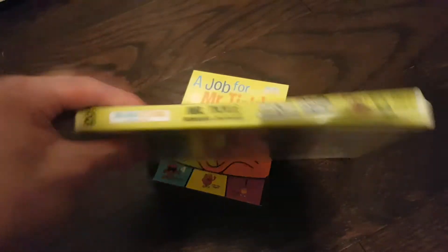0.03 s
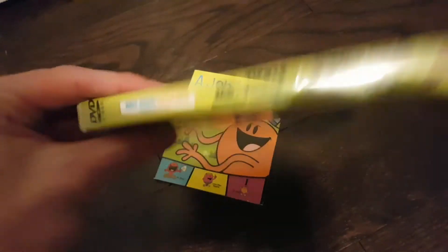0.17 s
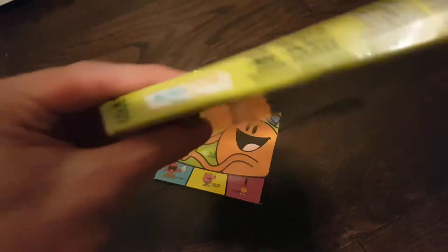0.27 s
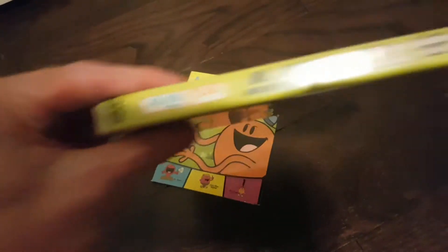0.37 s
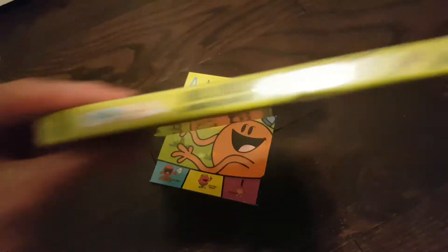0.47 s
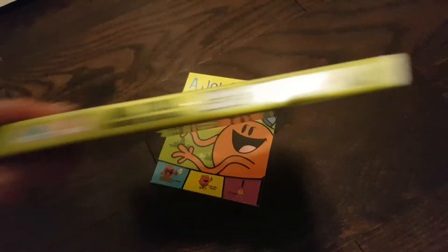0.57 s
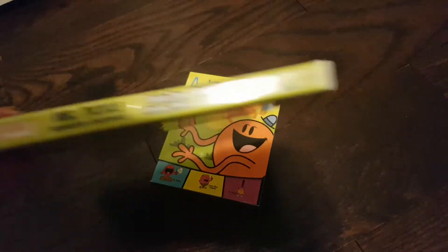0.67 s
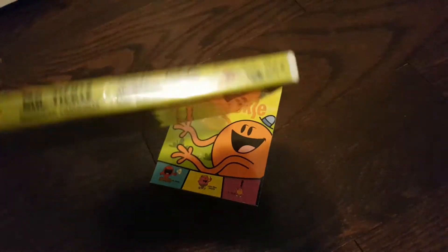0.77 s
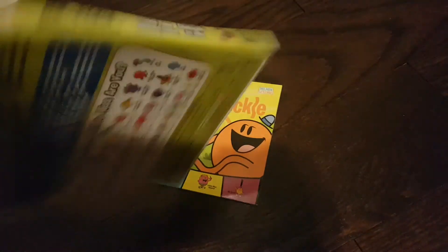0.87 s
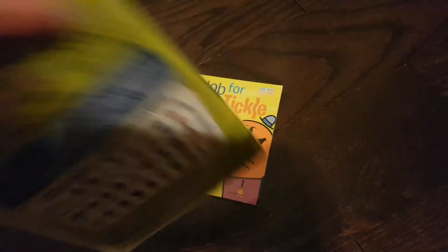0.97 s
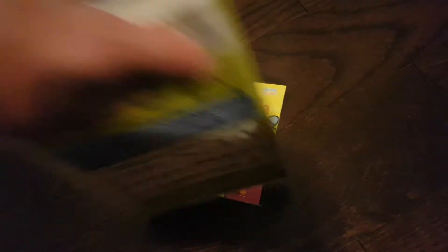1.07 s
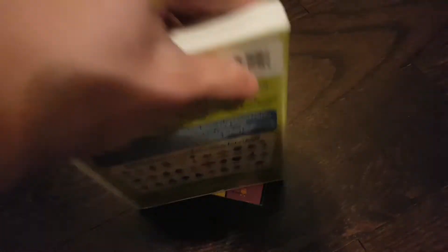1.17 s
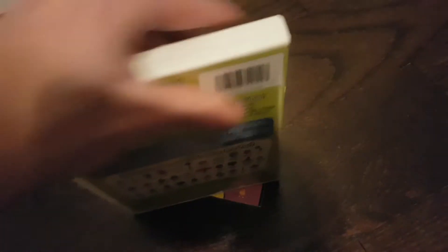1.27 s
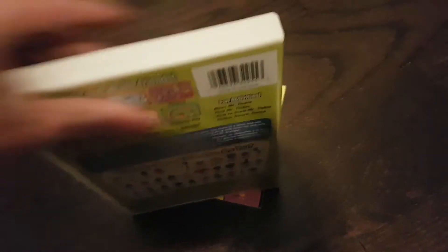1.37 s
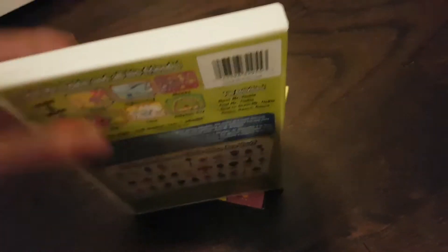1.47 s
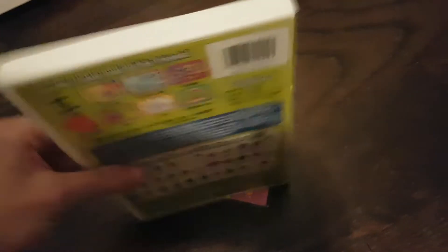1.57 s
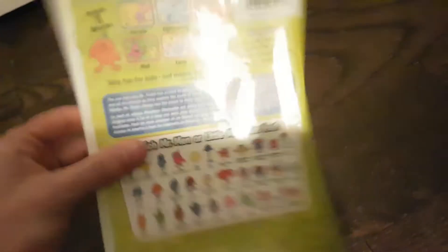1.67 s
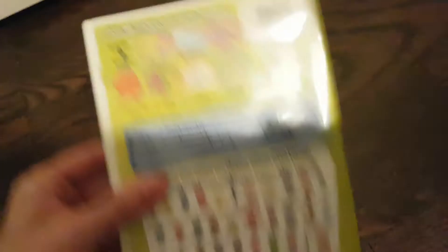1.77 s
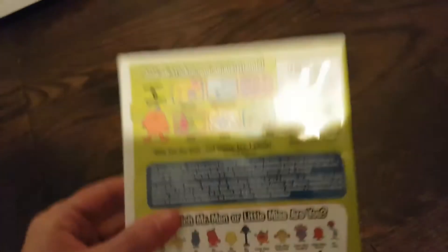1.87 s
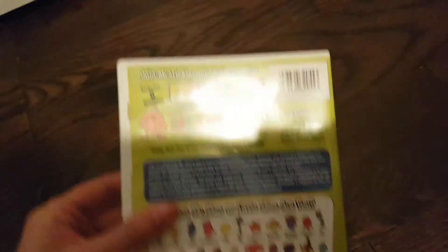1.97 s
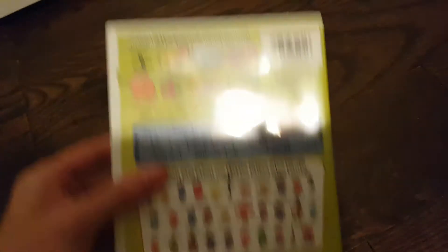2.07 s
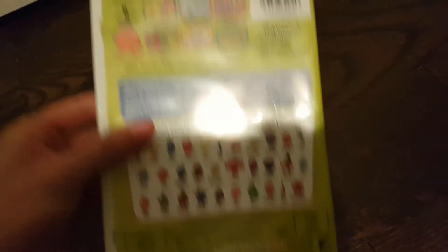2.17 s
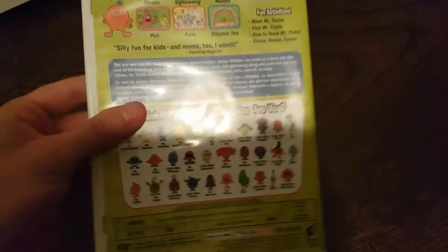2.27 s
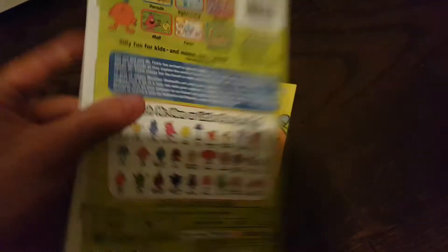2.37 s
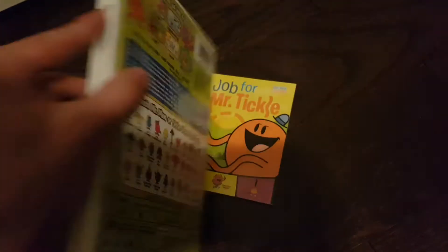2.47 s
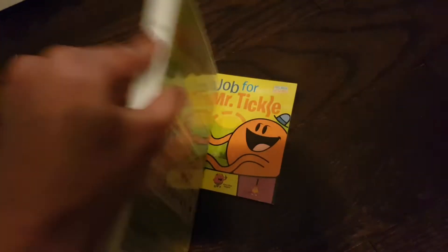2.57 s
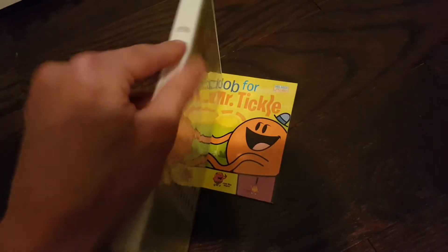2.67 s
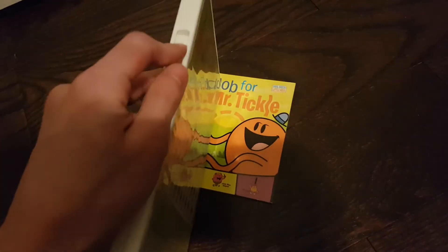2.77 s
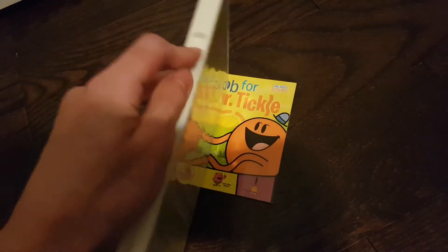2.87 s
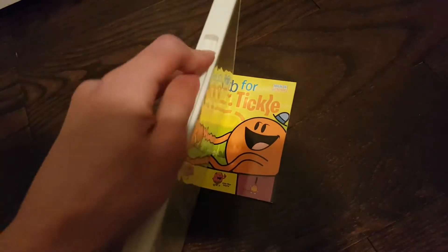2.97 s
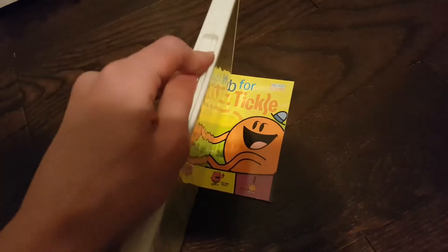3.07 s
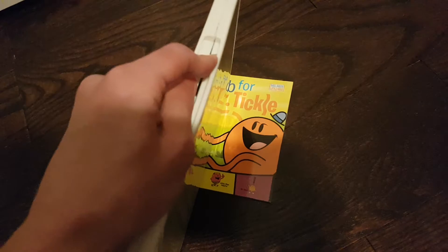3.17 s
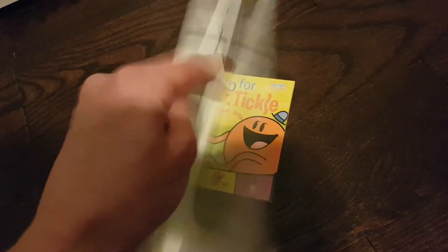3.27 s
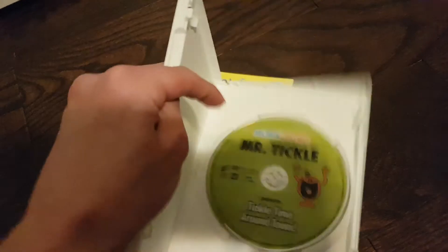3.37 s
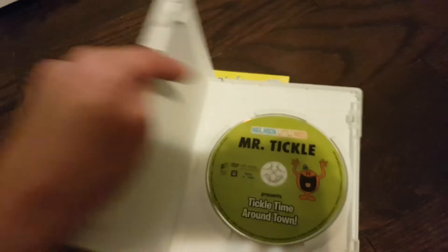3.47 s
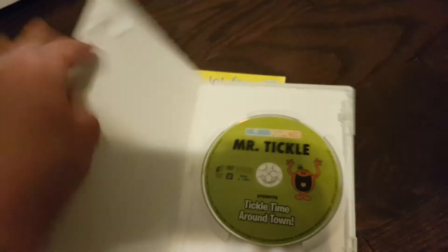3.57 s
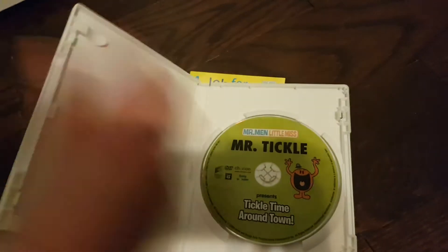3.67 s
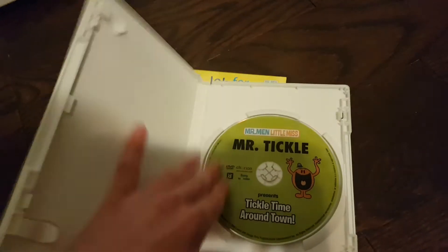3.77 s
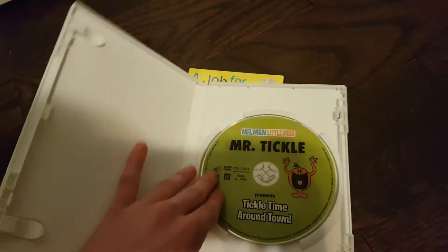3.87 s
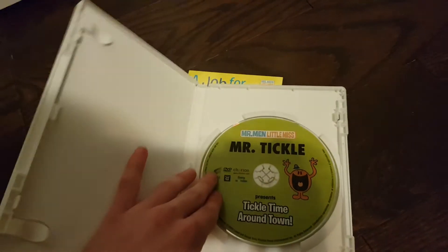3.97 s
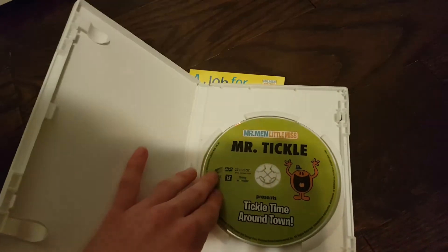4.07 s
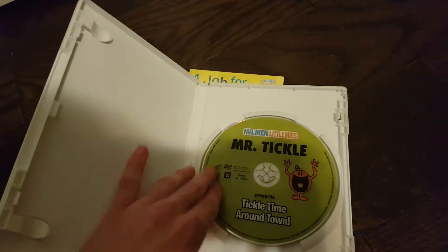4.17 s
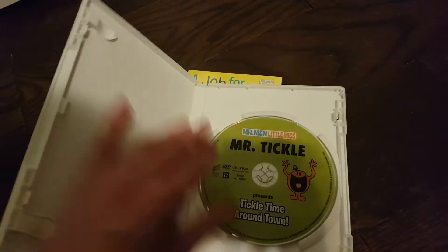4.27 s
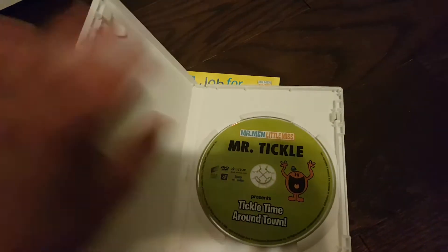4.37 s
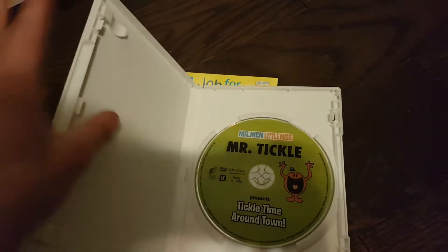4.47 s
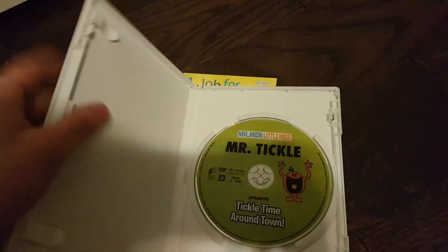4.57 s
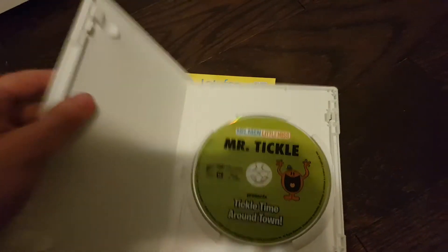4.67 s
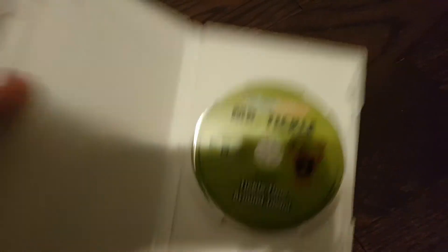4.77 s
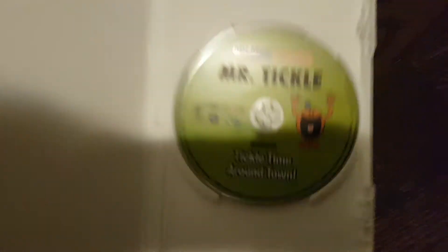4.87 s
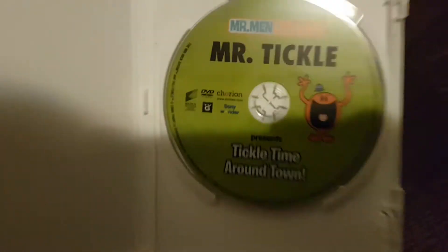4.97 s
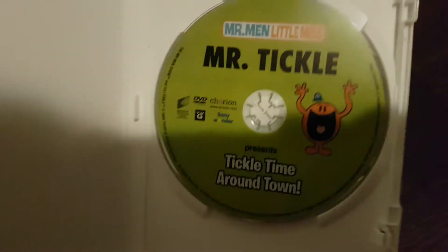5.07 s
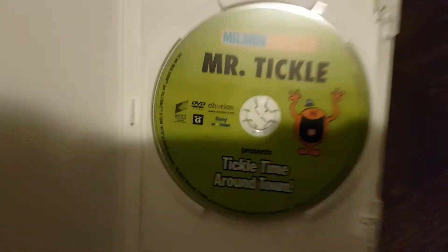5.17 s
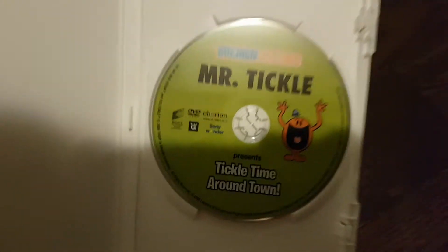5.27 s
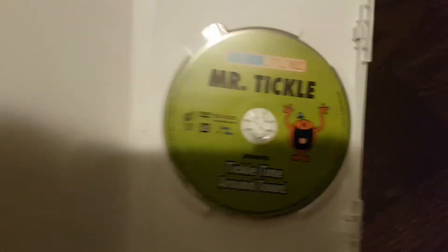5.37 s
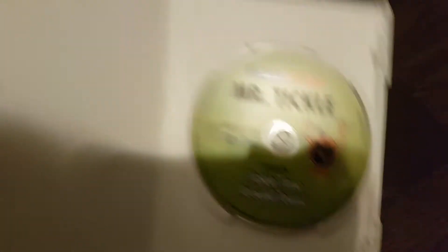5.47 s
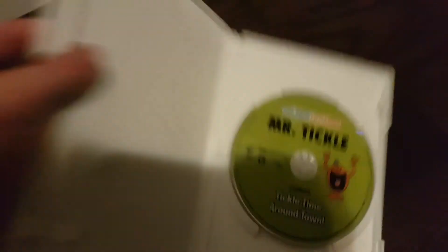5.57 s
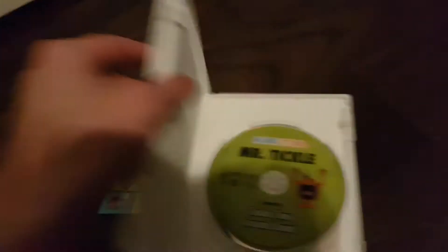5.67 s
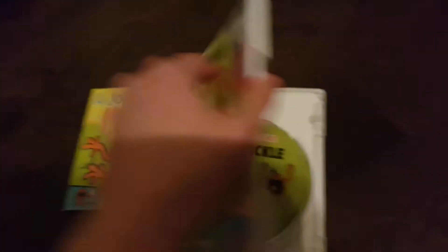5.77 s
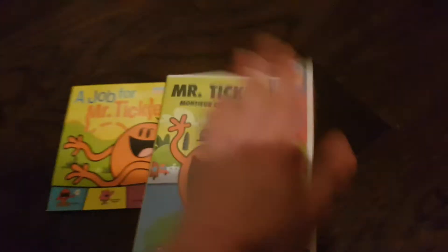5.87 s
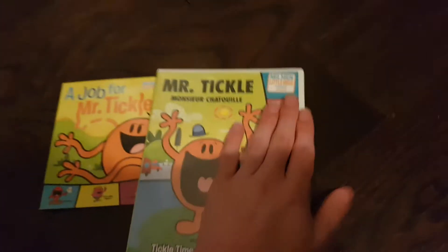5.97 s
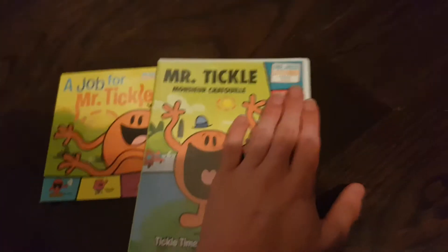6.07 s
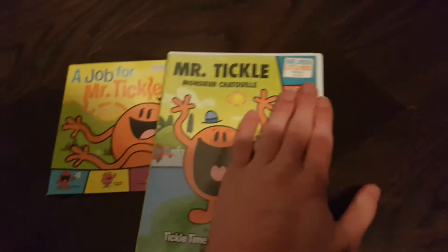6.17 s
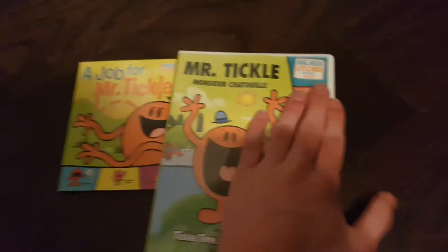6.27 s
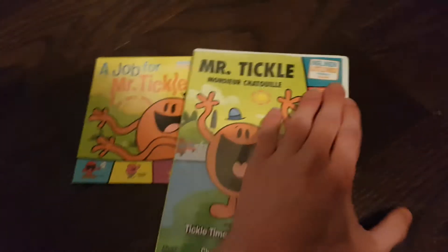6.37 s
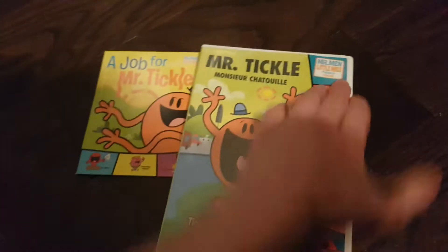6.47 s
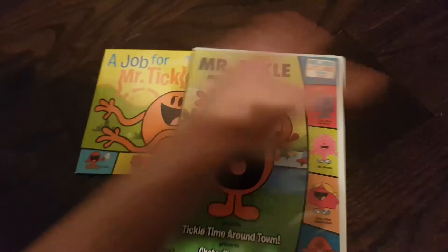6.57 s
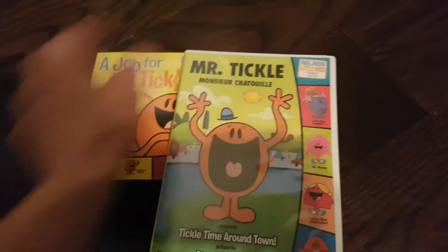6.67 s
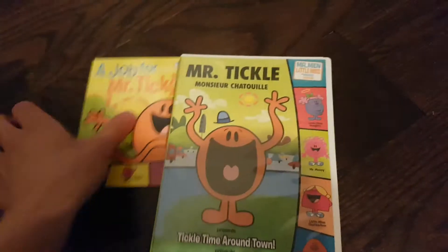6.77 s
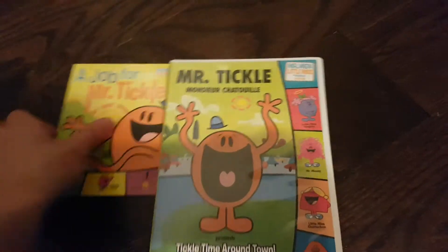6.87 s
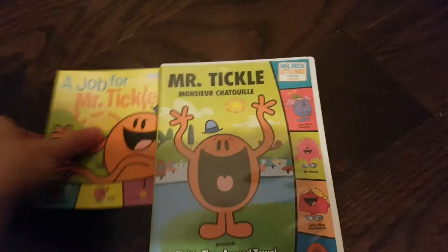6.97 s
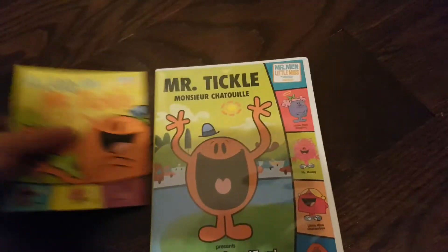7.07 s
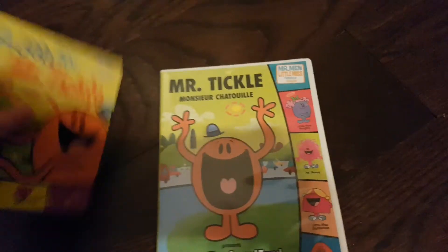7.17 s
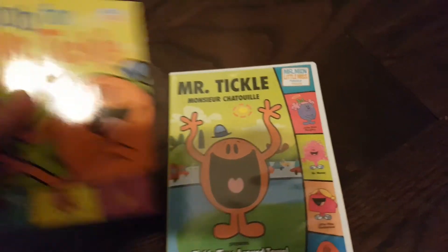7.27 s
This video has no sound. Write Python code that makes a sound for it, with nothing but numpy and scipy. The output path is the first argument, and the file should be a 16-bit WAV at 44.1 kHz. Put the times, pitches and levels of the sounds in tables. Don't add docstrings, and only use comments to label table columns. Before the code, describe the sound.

A quiet furnished room, heard closely in stereo, with low house rumble, thin steady hiss and a short soft reverberation. At 0.05 s a hollow plastic case makes a light cluster of taps; near 0.8 s there is a tiny tick, and at 1.1 s a firm, boxy knock. Faint fingertip rubs and ticks follow at 1.25-1.6 s, then a soft flurry around 2.55 s. At 3.28 s the case snaps open, a loud bright double crack with smaller rattles to 3.6 s. From 3.8 to 4.8 s only very faint brushes and ticks remain, followed by a barely audible airy drone around 5 s. Crisp closing clicks come at 5.6-5.75 s, more clacks at 5.9-5.97 s, then the loudest hollow knocks at 6.2 and 6.3 s. A soft airy swell passes at 6.4 s. Gentle taps, sliding and skin-like hiss fade out by 7.3 s.

```python
import sys
import numpy as np
from scipy import signal
from scipy.fft import rfft, irfft, next_fast_len
from scipy.io import wavfile

SR = 44100
rng = np.random.default_rng(int(sys.argv[2]) if len(sys.argv) > 2 else 0)


def output_pcm(signal):
    pcm = np.clip(np.atleast_2d(signal).T, -1, 1) * 32767
    wavfile.write(sys.argv[1], SR, np.round(pcm).astype(np.int16))


def volts_from_decibels(level):
    exponent = np.asarray(level, float) / 20
    return 10 ** exponent


N = 322795

# t/s, panel peak level/dB, loudest panel f/Hz, cavity level/dB, rim level/dB, crack level/dB
CASE_CONTACTS = [(0.051, -25.5, 700, -47, -43, -66), (0.058, -38.5, 1090, -61.5, -44, -64),
                 (0.065, -30, 1010, -41, -47.5, -65), (0.071, -31.5, 690, -35.5, -58, -65),
                 (0.781, -43, 791, -71, -68, -57.5), (0.928, -55, 705, -73, -76, -76.5),
                 (1.107, -11, 696, -16.5, -29.5, -42), (1.112, -23, 735, -17, -36, -51),
                 (1.233, -44, 743, -54, -58, -62.5), (1.251, -58.5, 600, -53, -66, -67),
                 (1.291, -39, 732, -42.5, -56, -74), (1.569, -33, 1320, -39, -48.5, -68),
                 (1.577, -40.5, 1190, -47, -53, -60), (1.597, -58, 1370, -52, -64, -72),
                 (2.447, -59, 603, -75, -62, -70), (2.535, -58, 791, -67, -80, -66.5),
                 (2.557, -33, 1190, -47, -41, -51.5), (2.569, -32, 646, -30.5, -58, -66.5),
                 (2.584, -30.5, 624, -29, -62, -68), (2.596, -28.5, 764, -30, -45, -64),
                 (2.741, -43.5, 649, -40.5, -62, -75.5), (2.892, -63, 834, -62, -58, -75.5),
                 (3.279, -10.5, 722, -21, -26.5, -33.5), (3.288, -11.5, 737, -44, -20.5, -38),
                 (3.293, -5.5, 1220, -44, -26, -38.5), (3.338, -35, 1020, -41, -35.5, -42.5),
                 (3.355, -31, 1800, -43, -34, -57), (3.377, -40, 778, -41, -39, -52.5),
                 (3.409, -23, 1430, -37.5, -35.5, -51.5), (3.42, -49, 716, -53, -37.5, -58),
                 (3.474, -58, 643, -63, -48, -55.5), (3.517, -60, 730, -56, -62, -52.5),
                 (3.573, -35, 1340, -51, -48.5, -52), (3.585, -46, 1010, -63, -67, -62.5),
                 (3.785, -51, 1026, -60, -39.5, -78.5), (3.806, -54, 1560, -71.5, -59.5, -75),
                 (3.823, -49, 794, -52.5, -50, -72), (3.858, -47.5, 1060, -67.5, -55.5, -69),
                 (4.179, -55, 611, -64, -60.5, -80), (4.206, -52, 1560, -64, -56, -83),
                 (4.363, -72, 657, -63.5, -60.5, -62.5), (4.567, -54, 1940, -72, -64, -81.5),
                 (4.614, -56, 727, -55, -63, -69.5), (4.769, -45, 1080, -63, -62, -75.5),
                 (4.785, -43.5, 1130, -69, -53, -74), (4.792, -35, 1070, -76.5, -49.5, -75),
                 (5.607, -15, 1154, -42, -25.5, -38), (5.649, -16, 780, -55, -26, -34),
                 (5.698, -34, 891, -35, -37, -50.5), (5.703, -32, 1840, -35.5, -31.5, -46),
                 (5.71, -27, 1510, -45, -35, -56.5), (5.737, -32, 1530, -49, -63, -68.5),
                 (5.77, -51, 1990, -57, -49, -58.5), (5.789, -52, 646, -58, -65, -63.5),
                 (5.901, -18.5, 940, -31, -32.5, -42.5), (5.905, -17.5, 649, -35, -35, -48.5),
                 (5.971, -18.5, 906, -34.5, -37, -48.5), (6.082, -45, 780, -64, -65, -78.5),
                 (6.198, 0.5, 732, -20.5, -19.5, -34.5), (6.301, -4, 700, -34, -15.5, -29),
                 (6.304, -10.5, 810, -15, -21.5, -30), (6.528, -45, 742, -62, -69, -61.5),
                 (6.551, -31, 692, -55.5, -56.5, -53), (6.744, -34.5, 767, -50, -62.5, -70),
                 (6.758, -39, 785, -37, -52, -70), (6.771, -28.5, 675, -41.5, -48.5, -64),
                 (6.844, -45.5, 670, -51, -61, -65), (6.882, -38, 738, -56, -54, -67),
                 (6.926, -49, 802, -65, -74, -81), (7.094, -36.5, 785, -58, -48, -61),
                 (7.135, -42, 1380, -57, -48, -62.5)]
# f/Hz, level/dB, t60/s
CAVITY_MODES = [(148, -10.5, 0.018), (205, -10, .05), (304.3, -1.5, 0.029), (391.7, 9.5, 0.037),
                (494, 6, 0.047), (566, -4.5, 0.021)]
# f/Hz, level/dB, t60/s
PANEL_MODES = [(683, 2, .018), (738, 0.5, 0.032), (794, -1.5, 0.04), (930, -8, 0.018), (1024, 1.5, 0.017),
               (1220, 7, .012), (1380, 8, .012), (1492, 4.5, 0.014), (1673.5, 6, 0.018), (1800, 5, .01),
               (1870, 0.5, 0.018)]
# f/Hz, level/dB, t60/s
RIM_MODES = [(2160, -3, .007), (2480, 0, .007), (2930, 1, .006), (3130, 1, 0.0052), (3735, -1.5, 0.0035),
             (4296, 1, 0.0078), (4840, -3.5, 0.0036), (5390, -1, 0.0031), (6124, -4.5, .004)]


def contacts():
    ring_len = SR // 12
    out = np.zeros(N + SR)
    t_s = np.arange(ring_len) / SR
    mode_hz = np.array(PANEL_MODES)[:, :1]
    for start_s, panel_db, pitch_hz, cavity_db, rim_db, crack_db in CASE_CONTACTS:
        chance, force = rng.random((2, 300))
        chatter = (chance < 0.03) * (force - 0.3) * volts_from_decibels(-60 * t_s[:300] / 0.013)
        chatter[0] = 1
        octaves_off = np.abs(np.log2(mode_hz / pitch_hz))
        favour_db = -9.0 * np.minimum(octaves_off, 1.2)
        slow_push = np.convolve(chatter, np.hanning(60))
        panels = volts_from_decibels(panel_db) * struck(PANEL_MODES, chatter, 4.4, favour_db)
        cavity = volts_from_decibels(cavity_db) * struck(CAVITY_MODES, slow_push, 6.5)
        rim = volts_from_decibels(rim_db + 14.5) * struck(RIM_MODES, chatter, 2.5)
        crack = band(rng.standard_normal(ring_len), 4300, 16500) * volts_from_decibels(-60 * t_s / 0.015)
        at = round(start_s * SR)
        out[at:at + ring_len] += panels + cavity + rim + volts_from_decibels(crack_db + 11.5) * crack
    return out[:N]


def struck(modes, contact, spread_db, favour_db=0):
    hz, level_db, t60_s = np.transpose(modes)[:, :, None]
    t_s = np.arange(SR // 12) / SR
    strength, sign = rng.standard_normal((2, len(modes), 1))
    gains = volts_from_decibels(level_db + favour_db + spread_db * strength) * np.sign(sign)
    decaying = gains * volts_from_decibels(-60 * t_s / t60_s) * np.sin(2 * np.pi * hz * t_s)
    ringing = signal.fftconvolve(np.sum(decaying, axis=0), contact)[:len(t_s)]
    return ringing / np.abs(ringing).max()


# t/s, panel level/dB, rim level/dB, hiss level/dB
RUB_CURVES = [
    [(0.05, -42, -58, -71), (0.054, -35, -41, -64), (0.074, -55, -48, -63), (0.082, -53, -73, -87),
     (0.14, -82, -82, -89)],
    [(1.29, -54, -57, -75), (1.314, -67, -55, -60), (1.378, -80, -86, -73), (1.432, -83, -88, -71),
     (1.45, -89, -94, -95)],
    [(1.56, -67, -74, -80), (1.568, -47.5, -53, -62), (1.596, -54, -67, -75), (1.64, -80, -79, -87)],
    [(2.38, -90, -81, -90), (2.394, -70, -80, -76), (2.402, -79, -85, -64), (2.454, -85, -72, -78),
     (2.49, -77, -76, -88)],
    [(2.8, -73, -91, -89), (2.814, -67, -68, -93), (2.896, -59, -63, -71), (2.914, -65, -80, -81),
     (2.93, -72, -78, -94)],
    [(3.5, -48, -60, -80), (3.518, -62, -51, -54), (3.558, -59, -82, -82), (3.576, -44, -48, -47.5),
     (3.62, -86, -85, -90)],
    [(3.77, -85, -67, -86), (3.786, -59, -55, -72), (3.794, -63, -69, -77), (3.858, -62, -66, -74),
     (3.89, -76, -84, -89)],
    [(4.35, -83.5, -88, -97), (4.368, -60, -56, -55.5), (4.412, -77, -82, -84), (4.42, -68, -75, -87)],
    [(4.75, -76, -78, -88), (4.784, -55, -67, -74.5), (4.794, -39.5, -66, -81), (4.812, -77, -79, -84),
     (4.84, -68, -82, -93)],
    [(6.74, -55, -76, -84), (6.742, -50, -66, -81), (6.768, -47, -67, -76), (6.816, -52, -64, -83),
     (6.866, -47.5, -58, -63), (6.96, -77, -98, -88)],
    [(6.98, -64, -63, -83), (7.07, -50, -53, -68), (7.098, -51.5, -40, -50), (7.12, -76, -54, -63),
     (7.146, -54, -45.5, -45.5), (7.21, -77, -85, -87), (7.27, -85.5, -89, -90)],
]


def rubbing():
    slips_per_s = np.array([[900.], [2500.], [9000.]])
    bands_hz = [(300, 2200), (2000, 5700), (6500, 13000)]
    sizes = volts_from_decibels(2.7 * rng.exponential(1, (3, N))) * rng.choice([-1, 1], (3, N))
    slips = sizes * (rng.random((3, N)) < slips_per_s / SR)
    parts = [rms_one(band(x, low_hz, high_hz)) for x, (low_hz, high_hz) in zip(slips, bands_hz)]
    levels = sum(volts_from_decibels(in_time(rows, N)) for rows in RUB_CURVES)
    return volts_from_decibels(-7.5) * np.sum(levels * parts, axis=0)


# f/Hz, width/Hz, level/dB
PORT_PEAKS = [(4274, 2500, -5), (11000, 7500, 10.5)]
# t/s, left level/dB, right level/dB
WALL_ECHOES = [(.0065, -13.5, -15.5), (0.0142, -12, -14), (.0165, -16, -12), (0.022, -17.5, -14.5)]
# f/Hz, width/Hz, level/dB
CAPSULE_PEAKS = [(8150, 4900, -5.5), (13400, 5000, -1)]


def heard(x):
    right_lag_s, low_hz, top_hz = 0.00011, 111.1, 15900
    size = next_fast_len(N + SR // 4)
    hz = np.fft.rfftfreq(size, 1 / SR)
    left = peaks(PORT_PEAKS, hz, 0.61)
    right = peaks(PORT_PEAKS, hz, -0.92) * np.exp(-2j * np.pi * hz * right_lag_s)
    path = np.array([left, right])
    for delay_s, left_db, right_db in WALL_ECHOES:
        delayed = np.exp(-2j * np.pi * hz * delay_s) / (1 + 1j * hz / 2500)
        path = path + volts_from_decibels(np.array([[left_db], [right_db]])) * delayed
    spectrum = rfft(x, size) * path + rfft(room_tail(x), size)
    near = irfft(spectrum * peaks(CAPSULE_PEAKS, hz, 0.88), size)[:, :N]
    near = signal.sosfilt(signal.butter(3, low_hz, "high", fs=SR, output="sos"), near)
    return signal.sosfilt(signal.butter(8, top_hz, fs=SR, output="sos"), near)


def peaks(table, hz, share):
    out = 1
    for centre_hz, width_hz, level_db in table:
        root = volts_from_decibels(share * level_db / 2)
        off = centre_hz ** 2 - hz ** 2
        out = out * (off + 1j * hz * width_hz * root) / (off + 1j * hz * width_hz / root + 1e-9)
    return out


# f/Hz, t60/s
TAIL_T60 = [(100, .26), (300, 0.19), (750, 0.22), (2000, .24), (5000, 0.23), (13000, .22)]
# f/Hz, level/dB
TAIL_COLOUR = [(100, -5.5), (300, -5.5), (550, -6), (750, -2.5), (1100, -4.5), (1600, -4.5), (3000, -3),
               (6000, -3), (9000, -2), (14000, -4.5)]


def room_tail(x):
    late = np.pad(x, (round(0.0043 * SR), 0))[:N]
    noise = [diffuse(N), diffuse(N)]
    fill = np.exp(-1 / (0.002 * SR))
    tail = 0
    for k, hz in enumerate(110 * 2 ** np.arange(0, 7.3, 0.4)):
        low_hz, high_hz = hz / 1.15, hz * 1.15
        keep = volts_from_decibels(-120 / at_hz(TAIL_T60, hz) / SR)
        poles = np.convolve([1, -keep], [1, -fill])
        stored = signal.lfilter([(1 - keep) * (1 - fill)], poles, band(late, low_hz, high_hz) ** 2)
        carrier = rms_one(band(noise[k % 2], low_hz, high_hz))
        tail = tail + volts_from_decibels(at_hz(TAIL_COLOUR, hz)) * np.sqrt(np.abs(stored)) * carrier
    return tail


# f/Hz, correlation/1
PORT_LIKENESS = [(60, 0.57), (180, 0.94), (550, 0.45), (1650, -0.15), (4970, -0.25), (15000, -0.12)]


def diffuse(count):
    mid, side = rfft(rng.standard_normal((2, count)))
    alike = np.clip(at_hz(PORT_LIKENESS, np.fft.rfftfreq(count, 1 / SR)), -1, 1)
    shared = np.sqrt((1 + alike) / 2) * mid
    opposed = np.sqrt((1 - alike) / 2) * side * [[1], [-1]]
    return irfft(shared + opposed, count)


# t/s, rumble level/dB, airy level/dB
HOUSE_LEVELS = [(0.0, -60, -70.5), (0.41, -67.5, -73), (1.2, -56, -72), (1.38, -66.5, -74),
                (2.2, -64.5, -71), (3.3, -68, -75), (3.44, -62, -58), (3.61, -65, -76), (4.1, -67, -75.5),
                (4.5, -65, -71), (5.61, -64.5, -75), (5.85, -64, -68), (6.01, -70, -83), (6.42, -57.5, -53),
                (6.56, -74.5, -71), (6.79, -61.5, -80), (6.95, -65, -71.5), (7.32, -65, -75)]
# f/Hz, level per Hz/dB
HOUSE_SPECTRUM = [(15, -45), (25, -16), (44, -8.5), (119, -3.5), (213, -15), (262, -2.5), (288, -12.5),
                  (347, -3.5), (408, -8.5), (592, -5), (900, -11), (3160, -20.5), (6500, -32), (8450, -65),
                  (14300, -120)]
# f/Hz, level per Hz/dB
HISS_SPECTRUM = [(3820, -37), (6500, -5.5), (9120, -5.5), (15200, 0), (16000, -2.5), (16300, -11)]


def background():
    hum_hz, hum_db, hiss_db = 117, -82, -81
    hz = np.fft.rfftfreq(N, 1 / SR)
    white = rfft(diffuse(N))
    house = white * volts_from_decibels(at_hz(HOUSE_SPECTRUM, hz))
    low = rms_one(irfft(house * (hz < 1200), N))
    airy = rms_one(irfft(house * (hz >= 1200) * (hz < 6500), N))
    hiss = rms_one(irfft(white * volts_from_decibels(at_hz(HISS_SPECTRUM, hz)) * (hz >= 6500), N))
    rows = [(-1, *HOUSE_LEVELS[0][1:]), *HOUSE_LEVELS, (9, *HOUSE_LEVELS[-1][1:])]
    low_db, airy_db = in_time(rows, N)
    hum = volts_from_decibels(hum_db) * np.sqrt(2) * np.sin(2 * np.pi * hum_hz * np.arange(N) / SR)
    return volts_from_decibels(low_db + 0.5) * low + volts_from_decibels(airy_db + 3.5) * airy + volts_from_decibels(hiss_db + 4) * hiss + hum + drones()


# t/s, f/Hz, level/dB
AIR_DRONES = [
    [(.8, 700, -81), (.9, 700, -83), (1.05, 700, -71)],
    [(4.87, 770, -85), (4.93, 770, -66), (5.05, 760, -69), (5.12, 760, -84)],
    [(5.04, 1560, -86), (5.1, 1560, -69), (5.18, 1560, -83), (5.24, 1560, -86)],
]


def drones():
    noise = diffuse(N)
    out = 0
    for rows in AIR_DRONES:
        pitch_hz = rows[1][1]
        level_db = in_time(rows, N)[1]
        out = out + volts_from_decibels(level_db) * rms_one(band(noise, 0.94 * pitch_hz, 1.06 * pitch_hz))
    return out


def in_time(rows, count):
    s, *columns = np.transpose(rows)
    t_s = np.arange(count) / SR
    return np.array([np.interp(t_s, s, c, -150, -150) for c in columns])


def at_hz(points, hz):
    points_hz, values = np.transpose(points)
    return np.interp(np.log(np.maximum(hz, 1)), np.log(points_hz), values)


def band(x, low_hz, high_hz):
    edges_hz = [low_hz, min(high_hz, 0.45 * SR)]
    return signal.sosfilt(signal.butter(2, edges_hz, "band", fs=SR, output="sos"), x)


def rms_one(x):
    return x / np.sqrt(np.mean(x ** 2) + 1e-20)


def scene():
    return heard(contacts() + rubbing()) + background()


def top_cut(x):
    return signal.sosfilt(signal.butter(12, 16810, fs=SR, output="sos"), x)


def record(dry):
    mix = 1.233 * np.tanh(dry / 1.334)
    return top_cut(mix)


dry = scene()
out = record(dry)
output_pcm(out)
```